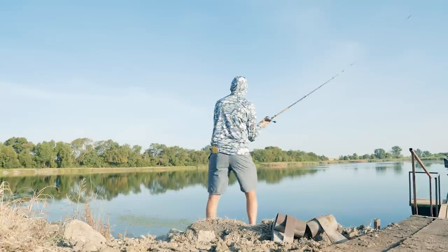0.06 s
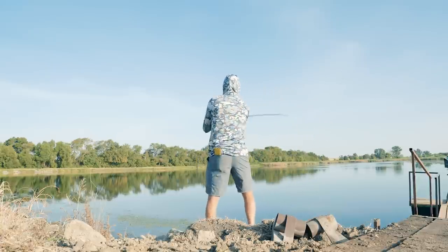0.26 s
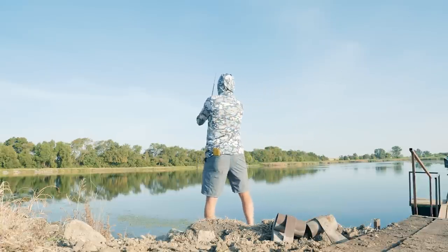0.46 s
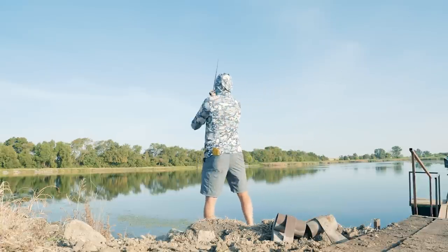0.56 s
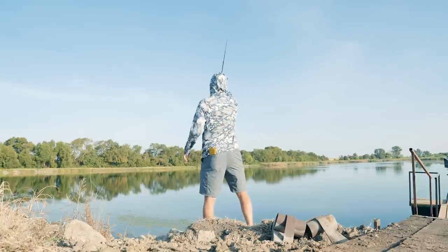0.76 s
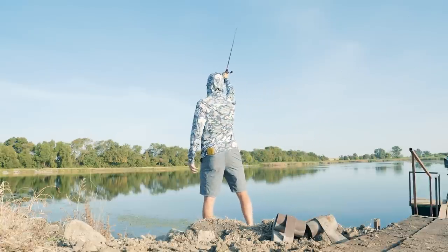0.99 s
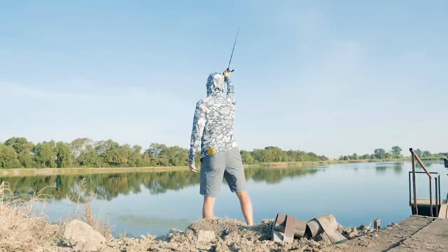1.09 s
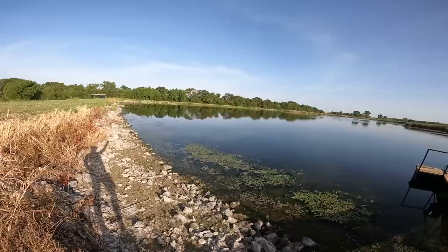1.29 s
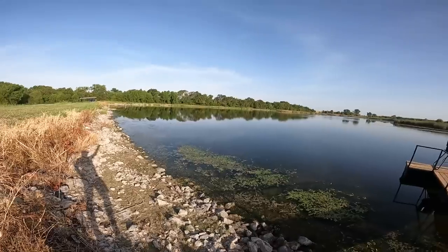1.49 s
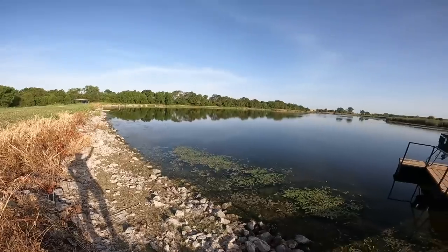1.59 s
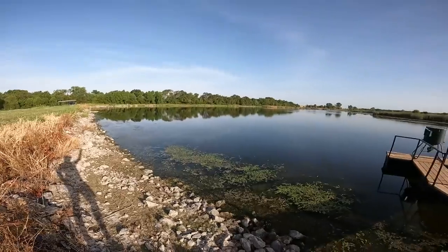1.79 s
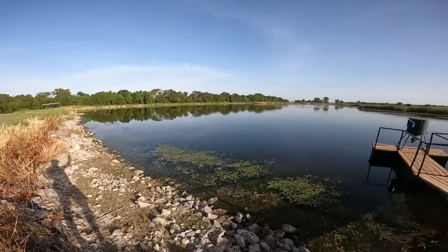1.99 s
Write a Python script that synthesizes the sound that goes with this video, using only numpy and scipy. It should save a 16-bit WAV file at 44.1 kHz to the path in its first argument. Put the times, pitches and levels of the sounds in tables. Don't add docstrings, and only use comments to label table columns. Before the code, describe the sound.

A fishing rod cast, close to a chest-worn microphone on a quiet lake bank. Sleeves rustle and the reel ticks from 0 to 0.2 s. A swish with a thin whistle swells from 0.25, peaking around 0.33-0.4 with hard clacks and knocks. Line hisses and rattles out, surging near 0.65, thinning by 1.0. Faint distant hum and air remain, with small ticks, then cloth rubs and light clicks from 1.9 s.

```python
import sys
import numpy as np
from scipy import signal
from scipy.fft import rfft, irfft, next_fast_len
from scipy.io import wavfile
from scipy.ndimage import uniform_filter1d, map_coordinates

SR = 44100
rng = np.random.default_rng(int(sys.argv[2]) if len(sys.argv) > 2 else 0)


def invert_db(x):
    u = np.asarray(x, float) / 20
    return 10 ** u


def generate_wav(signal):
    frames = np.transpose(np.atleast_2d(signal))
    scaled = np.clip(frames, -1, 1) * 32767
    pcm = np.round(scaled).astype(np.int16)
    wavfile.write(sys.argv[1], SR, pcm)


N = 90404

# (frequency [Hz], left minus right [dB])
NEAR_LEAN = [(60, -1), (180, 0.5), (550, -0.5), (1650, -1), (4970, -2), (15000, 4)]
FAR_LEAN = [(60, 1), (180, -3), (550, -3.5), (1650, 1.5), (4970, -1.5), (15000, 8.5)]
# (frequency [Hz], correlation [0-1])
NEAR_ALIKE = [(60, 0.88), (180, 0.46), (550, 0.55), (1650, 0.55), (4970, 0.85), (15000, 0.3)]


def unit(x):
    return x / np.sqrt(np.mean(x ** 2) + 1e-20)


def along(points, hz):
    f, value = np.transpose(points)
    return np.interp(np.log(hz + 1), np.log(f + 1), value)


def curves(rows, fade_s=0.14):
    s, *columns = np.transpose(rows)
    t = np.arange(N) / SR
    gate = np.interp(t, [s[0] - fade_s, s[0], s[-1], s[-1] + fade_s], [0, 1, 1, 0])
    return [gate] + [np.interp(t, s, column) for column in columns]


def wobble(rate):
    knots = rng.standard_normal(int(N * rate / SR) + 4)
    return map_coordinates(knots, [np.arange(N) * rate / SR])


def filtered(x, response):
    m = next_fast_len(N + SR // 2)
    return irfft(rfft(x, m) * response(np.fft.rfftfreq(m, 1 / SR)), m)[..., :N]


def led(x):
    # (frequency [Hz], phase by which the left port leads [rad])
    lead = [(60, 0.61), (190, -1.03), (400, -0.51), (600, -1.27), (1100, -0.86), (2800, -0.54),
            (4900, 0.45), (8000, -0.23), (12000, -0.5)]
    half = np.array([[1], [-1]]) / 2
    return filtered(x, lambda hz: np.exp(1j * half * along(lead, hz)))


def panned(lean_db):
    return invert_db(np.array([[lean_db], [-lean_db]]) / 2)


def ports(pair, gain, alike, lean):
    def mix(hz):
        angle = np.arccos(np.clip(along(alike, hz), -1, 1)) / 2
        return gain(hz) * np.array([np.cos(angle), np.sin(angle)])

    mid, side = filtered(pair, mix)
    half = np.array([[1], [-1]]) / 2
    leaning = filtered(np.array([mid + side, mid - side]), lambda hz: invert_db(half * along(lean, hz)))
    return unit(led(leaning))


def patchy(patchy_db):
    z = signal.stft(rng.standard_normal((2, N)), nperseg=256)[2]
    field = uniform_filter1d(rng.standard_normal(z.shape[1:]), size=4, axis=0)
    field = uniform_filter1d(field, size=8, axis=1)
    return signal.istft(z * invert_db(patchy_db * unit(field)), nperseg=256)[1][:, :N]


def grainy(per_s, share, spread_db=5):
    size = invert_db(spread_db * rng.uniform(-1.56, 1, N))
    clicks = (rng.random(N) < per_s / SR) * size * rng.standard_normal((2, N))
    return share * unit(clicks) + (1 - share) * patchy(patchy_db=1.5)


def sung(rows, width_hz, multiple=1, steady=0):
    gate, hz, level_db = curves(rows, fade_s=0.037)
    phase = 2 * np.pi * multiple * np.cumsum(hz) / SR
    in_phase = (steady + wobble(width_hz)) * np.cos(phase)
    quadrature = wobble(width_hz) * np.sin(phase)
    return gate * invert_db(level_db) * unit(in_phase + quadrature)


def thumps(rows, rise_cycles):
    out = np.zeros((2, N + SR))
    t = np.arange(SR // 2) / SR
    for s, db, hz, t60, lean_db in rows:
        swing = np.sin(2 * np.pi * hz * t) * invert_db(-60 * t / t60) * (1 - np.exp(-t * hz / rise_cycles))
        out[:, round(s * SR):][:, :len(t)] -= invert_db(db) * swing / np.abs(swing).max() * panned(lean_db)
    return out[:, :N]


def countryside():
    # (frequency [Hz], density [dB per Hz])
    far = [(240, -33), (400, -0.5), (903, -10), (975, -6), (1980, -10.5), (2230, -11.5), (4810, -21),
           (10200, -13.5), (15700, -29)]
    hum_spectrum = [(12, -30), (20, -5.5), (41, -7), (124, -13), (151, -6.5), (214, -4.5), (361, -11.5),
                    (450, -14), (580, -43), (990, -120)]
    # (frequency [Hz], correlation [0-1])
    far_alike = [(60, 0.81), (180, 0.64), (550, 0.3), (1650, 0.28), (4970, 0.5), (15000, 0.4)]
    hiss = ports(patchy(patchy_db=1.4), lambda hz: invert_db(along(far, hz)) * (hz > 400), far_alike, FAR_LEAN)
    hum = ports(patchy(patchy_db=1.0), lambda hz: invert_db(along(hum_spectrum, hz)) * (hz < 400) * (hz > 14),
                far_alike, FAR_LEAN)
    return invert_db(-62.5 + 0.075 * wobble(5.0)) * hiss + invert_db(-61.5 + 0.15 * wobble(5.9)) * hum


def cloth():
    # (start [s], length [s], level [dB])
    rubs = [(0, 0.078, -56.5), (0.072, 0.079, -59.5), (0.486, 0.22, -59), (0.858, 0.26, -62),
            (1.31, 0.27, -67.5), (1.68, 0.17, -68), (1.885, 0.092, -58), (1.968, 0.083, -57)]
    # (frequency [Hz], density [dB per Hz])
    fabric = [(180, -22), (300, 1), (527, -3.5), (1230, -8), (4110, -14.5), (5300, -20), (7200, -18),
              (11700, -28), (15700, -73)]
    # start [s], length [s], level [dB]
    last_rub = (2.023, 0.022, -58)
    t = np.arange(N) / SR

    def swell(start, length, db):
        return invert_db(db) * np.sin(np.pi * np.clip((t - start) / length, 0, 1)) ** 0.3

    def scuff_band(hz):
        return 1 / (1 + (2400 / (hz + 1)) ** 6) / (1 + (hz / 7000) ** 4)

    rub = ports(grainy(3500, 0.27), lambda hz: invert_db(along(fabric, hz)), NEAR_ALIKE, FAR_LEAN)
    scuff = ports(grainy(1800, 0.42), scuff_band, NEAR_ALIKE, FAR_LEAN)
    return sum(swell(*row) for row in rubs) * invert_db(1.5 * wobble(58)) * rub + swell(*last_rub) * scuff


def singing_guides():
    # (start [s], end [s], start pitch [Hz], end pitch [Hz], level [dB])
    singing = [(0, .22, 7400, 7200, -73), (0, .22, 6400, 6500, -72), (.58, .7, 2100, 2300, -60),
               (1.62, 1.78, 7300, 7400, -77), (.6, .76, 4400, 3950, -63), (.62, .8, 2900, 3000, -66),
               (1.9, 1.96, 2000, 2050, -67), (1.91, 1.96, 4000, 4500, -66), (1.99, 2.04, 1250, 1200, -64)]
    out = np.zeros(N)
    for start, end, hz, end_hz, db in singing:
        width_hz = 0.11 * hz * (hz > 1500) + 40
        out = out + sung([(start, hz, db), (end, end_hz, db - 3.5)], width_hz)
    return out * panned(0.75)


def knocks():
    # (time [s], peak level [dB], pitch [Hz], t60 [s], left minus right [dB])
    flexes = [(.002, -45.5, 281, 0.039, -5), (.3433, -26.5, 504, 0.014, -5), (.3421, -29.5, 840, 0.014, -5),
              (.371, -37, 460, 0.04, -10), (.385, -32.5, 356, 0.025, 7), (.303, -38, 380, 0.066, 1),
              (.316, -43, 280, 0.03, -3), (0.53, -44, 635, 0.024, 0), (.361, -34, 940, 0.084, -5),
              (.36, -36.5, 290, 0.018, 6), (.3845, -29, 202, 0.054, -1), (.403, -32, 640, 0.038, 1),
              (.458, -37.5, 1080, 0.025, 2), (.545, -50.5, 408, 0.057, -3), (.03, -50, 184, .08, -4.5),
              (.05, -50.5, 457, 0.03, -7)]
    return thumps(flexes, rise_cycles=0.18)


def ticks():
    # (time [s], peak level [dB], own pitch [Hz])
    clicks = [(0.045, -41, 2200), (0.1, -30, 5600), (0.129, -36, 7700), (0.1784, -38, 2590),
              (0.1812, -30.5, 10070), (0.2127, -48, 4200), (0.323, -22.5, 3220), (0.3233, -25.5, 4300),
              (0.3364, -39, 11100), (.3414, -25, 1600), (0.3468, -24, 1700), (0.3477, -34, 6000),
              (0.3588, -27, 6700), (0.3667, -36, 1700), (0.381, -43, 3900), (0.39, -40, 11900),
              (0.409, -36, 6300), (.452, -35, 4800), (0.461, -38, 7400), (0.559, -40, 9000),
              (0.9713, -38, 7840), (1.0811, -42.5, 7800), (1.907, -53, 4100), (1.9335, -45, 4504),
              (1.955, -43, 4107), (2.027, -40, 3100), (2.0312, -40, 2840), (2.0405, -43, 3280)]
    # (frequency [Hz], level [dB])
    modes = [(3100, -6), (4400, -7), (7000, 1), (10500, -5)]
    ring_t60_s, crack_t60_s, rise_s = 0.0035, 0.006, 0.00033
    out = np.zeros((2, N + SR))
    t = np.arange(SR // 20) / SR
    for s, db, hz in clicks:
        ring = invert_db(3) * np.sin(2 * np.pi * hz * t)
        for f, level in modes:
            ring += invert_db(level + 2.5 * rng.standard_normal()) * np.sin(2 * np.pi * f * t)
        crack = 1.5 * uniform_filter1d(np.diff(rng.standard_normal(len(t) + 1)), size=2)
        tick = ring * invert_db(-60 * t / ring_t60_s) + crack * invert_db(-60 * t / crack_t60_s)
        tick *= 1 - np.exp(-t / rise_s)
        out[:, round(s * SR):][:, :len(t)] += invert_db(db - 5.0) * tick * panned(-2.8)
    return filtered(out[:, :N], lambda hz: 1 / (1 + (hz / 9500) ** 4))


def bumps():
    # (time [s], peak level [dB], pitch [Hz], t60 [s], left minus right [dB])
    inward = [(.174, -48.5, 22, 0.92, 4), (.218, -30, 20.8, 0.25, -11.5), (.33, -61, 30, 0.45, 0),
              (.49, -48.5, 17.7, 0.32, -4), (.6, -56.5, 25, 1, 5), (.89, -56, 28.5, 0.33, -10),
              (1.385, -54, 31.2, 0.19, -12), (1.47, -57, 12, 0.16, -3)]
    outward = [(.335, -47, 43, 0.11, -4), (1.885, -48, 29.1, 0.19, -5), (1.965, -50.5, 18, 0.25, -2)]
    left, right = thumps(inward, rise_cycles=0.27) - thumps(outward, rise_cycles=0.16)
    lag_s = 0.0044
    return np.array([np.roll(left, round(lag_s * SR)), right])


def swish():
    # (time [s], air rush level [dB], brightness [dB])
    swing = [
        (.2, -60.5, 1.5),
        (.25, -52, -2),
        (.29, -51, -5.5),
        (.315, -44, -2.5),
        (.345, -35.5, -0.5),
        (.39, -39.5, -1),
        (.425, -44.5, -0.5),
        (.462, -46, 1.5),
        (.5, -61, -7.5),
    ]
    # (frequency [Hz], density [dB per Hz])
    rush = [(53, -6.5), (90, -14), (192, -5), (800, -13), (1030, -12), (1600, -9.5), (6910, -18.5),
            (11900, -43), (15700, -43)]
    split_hz = 2600
    gate, level_db, tilt_db = curves(swing)
    dull = ports(grainy(1500, 0.36, spread_db=6.0),
                 lambda hz: invert_db(along(rush, hz)) / (1 + (hz / split_hz) ** 2), NEAR_ALIKE, NEAR_LEAN)
    bright = ports(grainy(2400, 0.3),
                   lambda hz: invert_db(along(rush, hz)) / (1 + (split_hz / (hz + 1)) ** 2), NEAR_ALIKE, NEAR_LEAN)
    flutter = invert_db(wobble(71.4))
    return gate * invert_db(level_db) * flutter * (invert_db(-tilt_db) * dull + invert_db(-5.0 + tilt_db) * bright)


def whistle():
    # (time [s], pitch [Hz], level [dB])
    line = [(.225, 7700, -65), (.255, 7200, -60), (.28, 7750, -60), (.3, 8800, -53), (.316, 9750, -55),
            (.335, 10300, -59)]
    undertone = [(.25, 6100, -64), (.275, 6640, -55), (.295, 7360, -67)]
    return (sung(line, width_hz=1000) + sung(undertone, width_hz=1000)) * panned(0.75)


def payout():
    # (time [s], level [dB], thinness [dB])
    running = [
        (.325, -52.5, 6.5),
        (.46, -51, 1),
        (.55, -56, 0),
        (.645, -50.5, 0.5),
        (.69, -55, 0),
        (.8, -56, -1),
        (.98, -59.5, 3.5),
        (1.05, -68.5, 5.5),
        (1.27, -68, 4),
    ]
    # (frequency [Hz], density [dB per Hz])
    guides = [(410, -11), (700, -10), (2120, 2.5), (5330, -6), (7290, -8), (11800, -12), (15700, -25.5)]
    # (frequency [Hz], width [Hz], level over the hiss [dB])
    spool = [(4360, 1000, -0.5), (6800, 1700, -3), (12000, 1600, 0.5)]
    split_hz, slaps_per_s, slap_share = 5200, 2500, 0.49

    def body(f):
        ringing = sum(invert_db(db) * 1j * f * w / (c * c - f * f + 1j * f * w) for c, w, db in spool)
        return invert_db(along(guides, f)) * (1 + ringing)

    gate, level_db, tilt_db = curves(running, fade_s=0.015)
    low = ports(grainy(slaps_per_s, slap_share),
                lambda f: body(f) / (1 + (f / split_hz) ** 6), NEAR_ALIKE, NEAR_LEAN)
    high = ports(grainy(slaps_per_s, slap_share),
                 lambda f: body(f) / (1 + (split_hz / (f + 1)) ** 6), NEAR_ALIKE, NEAR_LEAN)
    level = invert_db(level_db + wobble(26.9))
    return gate * level * (invert_db(-2.5 - tilt_db) * low + invert_db(-3.5 + tilt_db) * high)


def tip_hum():
    # (time [s], pitch [Hz], level [dB])
    tip_notes = [
        [(.47, 1190, -62), (.52, 1245, -60), (.6, 1185, -64)],
        [(.46, 1880, -62), (.54, 1960, -62), (.6, 1900, -63)],
        [(.6, 1080, -67), (.68, 1020, -68)],
    ]
    return sum(sung(note, width_hz=30, steady=1.5) for note in tip_notes) * panned(0.75)


def drone():
    # (time [s], pitch [Hz], level [dB])
    wavering = [(.5, 216, -75), (.68, 169.4, -60), (.76, 190, -64), (.87, 225, -59), (.97, 194.1, -63),
                (1.1, 200.3, -71), (1.22, 244.8, -65), (1.35, 214.8, -68.5), (1.52, 214.7, -67.5),
                (1.65, 179.9, -64), (1.8, 225.2, -75), (1.9, 201.1, -73), (2.0, 228.5, -55)]
    shared = sung(wavering, width_hz=75)
    separate = np.array([sung(wavering, width_hz=75) for port in "LR"])
    return invert_db(-3) * (shared + separate)


def whir():
    # (time [s], pitch [Hz], level [dB])
    spin = [
        (.636, 4400, -65),
        (.652, 3700, -60),
        (.668, 3150, -64),
    ]
    overtone = sung(spin, width_hz=1000, multiple=1.8)
    return (sung(spin, width_hz=1000) + invert_db(3.0) * overtone) * panned(0.75)


def scene():
    air = countryside() + drone()
    tones = singing_guides() + whistle() + tip_hum() + whir()
    tackle = led(tones + knocks() + ticks())
    return air + cloth() + tackle + bumps() + swish() + payout()


def band_limit(x):
    return signal.sosfilt(signal.butter(12, 16000, fs=SR, output="sos"), x)


def record(dry):
    # (frequency [Hz], gain [dB])
    housing = [(2500, 0), (4300, 2.5), (4900, -2.5), (5700, -0.5), (7300, 4), (9300, 0), (12200, 1),
               (13600, 0), (15700, 0)]
    top_hz = 15750
    mix = filtered(dry, lambda hz: invert_db(along(housing, hz)) * (hz < top_hz))
    return band_limit(mix)


dry = scene()
out = record(dry)
generate_wav(out)
```